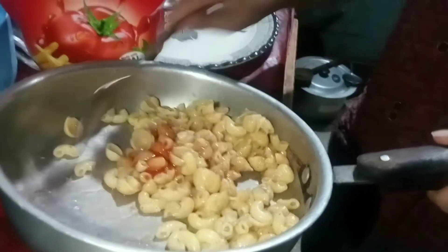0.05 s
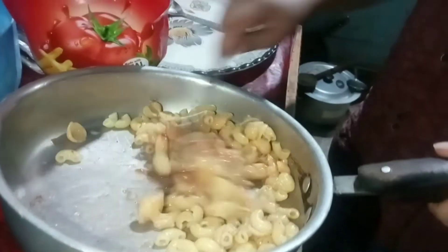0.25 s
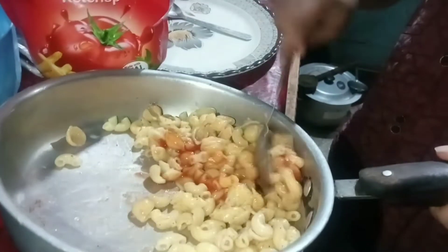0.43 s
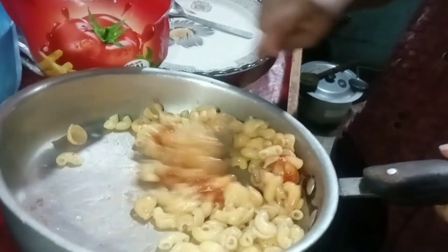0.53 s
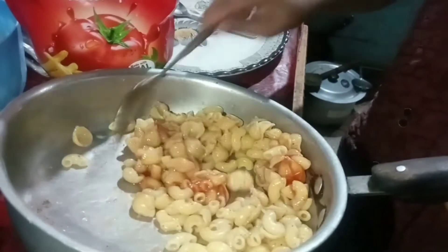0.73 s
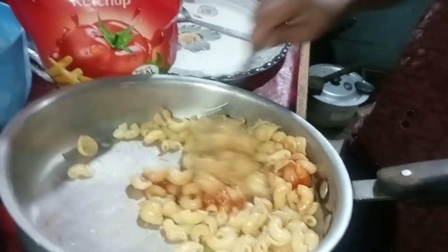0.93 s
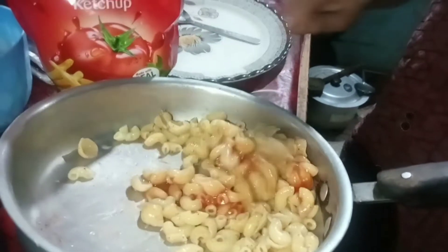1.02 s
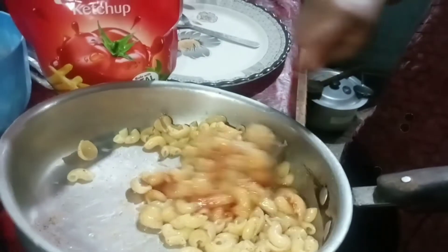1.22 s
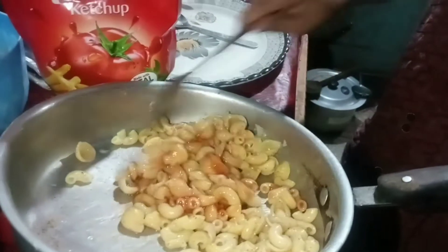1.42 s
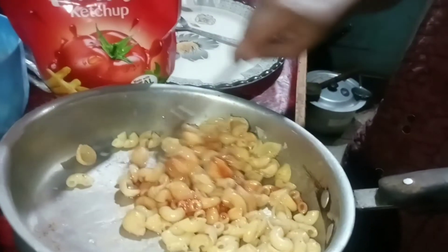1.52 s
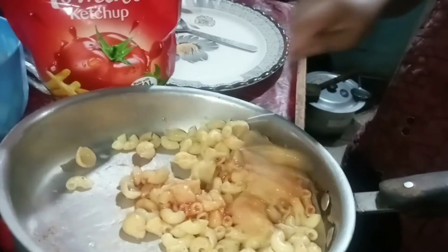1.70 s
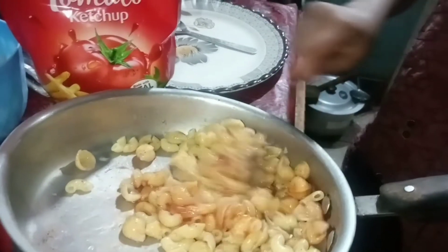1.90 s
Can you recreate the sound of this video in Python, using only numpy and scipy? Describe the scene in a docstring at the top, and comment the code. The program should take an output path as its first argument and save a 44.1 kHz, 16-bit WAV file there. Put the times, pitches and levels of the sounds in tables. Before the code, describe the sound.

A steel spoon clanks against a steel pan about three times a second while stirring pasta. The knocks ring briefly, with short scrapes between them, close to the microphone in a small kitchen with soft hiss.

```python
"""Clanks of a steel spoon stirring pasta in a steel pan, about three a second, close to the microphone.
Each knock sets the pan ringing; hard ones carry a low thud, the hardest a dull pop of microphone overload.
The spoon scrapes between knocks, and a faint rustle of stirred pasta comes last.
The place is a small hard kitchen with a low rumble and soft hiss; the pan sits centred in the image.
The recorder's limiter ducks each clank and recovers while the ring dies, so the ring seems to hold on."""
import sys
import numpy as np
from scipy import signal
from scipy.fft import rfft, irfft
from scipy.io import wavfile
from scipy.ndimage import uniform_filter1d

SR = 44100
rng = np.random.default_rng(int(sys.argv[2]) if len(sys.argv) > 2 else 0)


def dump_mix(stems):
    """Bounce the given channels to the path in sys.argv[1] as a 16-bit WAV at rate SR."""
    frames = np.atleast_2d(stems).T  # one column per channel
    limited = np.clip(frames, -1, 1)  # hard clip at full scale
    pcm = np.round(limited * 32767).astype(np.int16)
    wavfile.write(sys.argv[1], SR, pcm)


N = 85995

# spoon strikes pan: start_s, level_db, contact_s, low_edge_hz, tilt_db_per_octave, favoured_hz, boost_db
KNOCKS = [(-.125, 0.5, 0.0017, 1310, 0.5, 1760, 2), (0.2157, -1, 0.0048, 1090, -1.2, 6900, 6),
          (.5465, -0.5, 0.0048, 1300, -0.66, 2320, 4.5), (.8638, 6, 0.0025, 970, 0.46, 1243, 5),
          (1.2068, -15, 0.0046, 694, 4, 2820, 11.5), (1.229, -16, 0.0026, 694, -1.5, 2930, 7),
          (1.2615, -14, 0.011, 695, 1, 2840, 7.5), (1.2772, -8.5, 0.0014, 700, 0, 1760, -6),
          (1.6143, -33.5, 0.0018, 1290, 7.5, 6940, -28), (1.6168, -5.5, 0.0021, 1093, -3, 1160, 8)]
# low thuds under hard knocks, the last with a pop of microphone overload: start_s, level_db, upper_edge_hz
THUDS = [(.217, -19.5, 310), (.547, -11.5, 333), (.8648, -1.5, 1840)]
# spoon scrapes, then a faint closing rustle of stirred pasta:
# start_s, length_s, level_db, low_edge_hz, favoured_hz, boost_db
SCRAPES_AND_RUSTLE = [(.243, 0.063, -22.5, 1050, 1210, 12.5), (.575, 0.073, -29.5, 1420, 2140, 16),
                      (.888, 0.075, -18.5, 1140, 1410, 7.5), (1.299, 0.043, -18.5, 790, 755, 13),
                      (1.84, 0.14, -59, 1300, 2350, 14)]
# ringing modes of the pan: pitch_hz, level_db, t60_s
PAN_MODES = [(761, -12, .25), (1200, -1, .4), (1256, -4, .33), (1364, -1, .38), (1408, 0, .4),
             (1476, -3, .38), (1599, -2, .36), (1809, 2, .33), (2194, -3, .36), (2271, -2, .4),
             (2431, -3, .34), (2596, -3, .34), (2751, -3, .36), (2806, -4, .33), (3864, -5, .34),
             (4740, -1, .3), (4772, -3, .3), (5758, -3, .3)]
# overall spectrum of steel meeting steel: frequency_hz, level_db
STEEL_SPECTRUM = [(50, -14.5), (220, -1), (450, -8), (720, 2), (930, -5), (1300, -3), (2000, -4.5),
                  (2900, -6), (3600, -11.5), (6000, -11), (7600, -13), (11000, -13.5), (13500, -18.5),
                  (16000, -21)]
# broad resonances of spoon and pan wall in contact: centre_hz, width_hz, boost_db
STEEL_PEAKS = [(1310, 260, 7), (1810, 130, 8), (2310, 260, 6), (2780, 180, 4), (3900, 160, 7),
               (4770, 160, 10), (5770, 260, 9), (6860, 320, 9), (8180, 280, 9), (9350, 400, 8),
               (10550, 400, 4), (12000, 400, 4), (14950, 700, 13)]
# reverberation of the kitchen: frequency_hz, t60_s
KITCHEN_DECAY = [(150, 1), (700, 0.33), (1500, 0.33), (2500, 0.36), (5000, 0.32), (9000, 0.25),
                 (15000, 0.19)]
# spectrum of the room tone: frequency_hz, relative_level_db
ROOM_TONE = [(25, -6), (50, -20), (100, 6.5), (170, 0.5), (260, -1.5), (420, -10), (850, -11), (1400, -8.5),
             (2500, -6), (3800, -13.5), (6000, -16), (9000, -21.5), (13000, -24.5), (15500, -32)]
# stereo width of the treble: frequency_hz, side_minus_mid_db
STEREO_WIDTH = [(3100, -72), (4300, -17), (8000, -13), (14000, -10)]

CLANK_T60_S, RING_DB, RING_SPREAD_DB = .026, -33.5, 5
CLANK_GRAIN, SLIP_GRAIN = .7, 1.05  # higher is grittier
THUD_DECAY_S, THUD_HZ, IMPULSE_DB = .0035, 76.5, 21.5
REVERB_DB, REVERB_BUILD_S, ROOM_TONE_DB = -4, .012, -51
LIMIT_DB, SENSE_S, ATTACK_S, RECOVER_DB_PER_S = -16.5, .0013, .0008, 159
LOW_CUT_HZ, HIGH_CUT_HZ = 35, 15850


def knock(level_db, contact_s, *spot):
    """The spoon chatters briefly against the wall, giving a clank and the long ring of the pan."""
    t = np.arange(SR) / SR
    rise = np.sqrt(np.minimum(t / contact_s, 1))
    decay = gain(-60 * np.maximum(t - contact_s, 0) / CLANK_T60_S)
    chatter = unit_rms(rng.standard_normal(SR) * np.minimum(rng.exponential(1, SR), 2) ** CLANK_GRAIN)
    clank = colour(chatter * rise * decay, lambda hz: steel_db(hz) + spot_db(hz, *spot) + uneven_db(hz))
    return gain(level_db) * (kitchen(clank) + gain(RING_DB) * pan_ring(t, spot))


def pan_ring(t, spot):
    """The pan's modes die away, each struck with a random strength and phase."""
    ring = np.zeros(len(t))
    for hz, mode_db, t60_s in PAN_MODES:
        strength, phase = rng.standard_normal(2)
        struck_db = mode_db + spot_db(hz, *spot) + RING_SPREAD_DB * strength
        ring += gain(struck_db - 60 * t / t60_s) * np.sin(2 * np.pi * (hz * t + phase))
    return ring


def thud(level_db, upper_edge_hz):
    """A low thud; with a high upper edge, its impulse is the dull pop of an overloaded microphone."""
    t = np.arange(SR // 8) / SR
    swing = .32 * np.exp(-t / THUD_DECAY_S) * np.sin(2 * np.pi * THUD_HZ * t)
    impulse = gain(IMPULSE_DB) * (t == 0)
    band = signal.butter(3, [45, upper_edge_hz], "band", fs=SR, output="sos")
    return gain(level_db) * signal.sosfilt(band, swing + impulse)


def scrape_or_rustle(length_s, level_db, low_edge_hz, favoured_hz, boost_db):
    """Dense uneven slips, of the spoon or of stirred pasta, coloured by the steel pan."""
    def body_db(hz):
        modes = sum(3 * gain(db / 2) * peak(hz, pitch, width_hz=16.3) for pitch, db, _ in PAN_MODES)
        return steel_db(hz) + modes + spot_db(hz, low_edge_hz, 0, favoured_hz, boost_db) + uneven_db(hz)

    t = np.arange(SR) / SR
    slips = unit_rms(rng.standard_normal(SR) * rng.exponential(1, SR) ** SLIP_GRAIN)
    stroke = np.sqrt(abs(np.sin(np.pi * np.minimum(t / length_s, 1))))
    return gain(level_db) * kitchen(colour(slips * stroke, body_db))


def steel_db(hz):
    """Spoon and pan wall in contact: a wide spectrum with broad resonances."""
    resonances = sum(db * peak(hz, centre, width) for centre, width, db in STEEL_PEAKS)
    return curve_at(STEEL_SPECTRUM, hz) + resonances


def spot_db(hz, low_edge_hz, tilt_db_per_octave, favoured_hz, boost_db, shelf_db=-16):
    """Where and how the pan is touched sets the low edge, the brightness and a favoured resonance."""
    low_shelf = shelf_db / (1 + (hz / low_edge_hz) ** 10)
    tilt = tilt_db_per_octave * np.log2(np.maximum(hz, 1000) / 2500)
    return low_shelf + tilt + boost_db * peak(hz, favoured_hz, .14 * favoured_hz)


def uneven_db(hz, spread_db=2.5, step_hz=110):
    """Each contact wakes some of the many resonances more than others."""
    grid_hz = np.arange(0, SR / 2, step_hz)
    return spread_db * np.interp(hz, grid_hz, rng.standard_normal(len(grid_hz)))


def kitchen(direct):
    """The direct sound reaches the microphone with dense reflections that die faster in the treble."""
    hz, t, noise = signal.stft(rng.standard_normal(SR), SR, nperseg=256)
    decay = gain(-60 * t / curve_at(KITCHEN_DECAY, hz)[:, None])
    _, tail = signal.istft(noise * decay, SR, nperseg=256)
    tail *= 1 - np.exp(-np.arange(len(tail)) / SR / REVERB_BUILD_S)
    reflections = signal.fftconvolve(direct, tail / np.linalg.norm(tail))[:len(direct)]
    return direct + gain(REVERB_DB) * reflections


def room_tone():
    """Low rumble and soft steady hiss behind the pan."""
    spectrum = gain(curve_at(ROOM_TONE, np.fft.rfftfreq(N, 1 / SR)))
    noise = irfft(rfft(rng.standard_normal(N)) * spectrum, N)
    return gain(ROOM_TONE_DB) * unit_rms(noise)


def gain(db):
    """Decibels to amplitude."""
    return 10 ** (np.asarray(db) / 20)


def unit_rms(x):
    """Scales to an rms of one."""
    return x / np.sqrt(np.mean(x ** 2) + 1e-20)


def peak(hz, centre_hz, width_hz):
    """Resonance curve of height one."""
    return 1 / (1 + (2 * (hz - centre_hz) / width_hz) ** 2)


def curve_at(table, hz):
    """Interpolates a table on a log-frequency axis."""
    table_hz, values = np.transpose(table)
    return np.interp(np.log(hz + 1), np.log(table_hz), values)


def colour(x, curve_db, size=4096):
    """Minimum-phase filter whose gain follows curve_db(hz)."""
    log_gain = np.log(gain(curve_db(abs(np.fft.fftfreq(size, 1 / SR)))))
    taps = np.fft.ifft(np.exp(np.conj(signal.hilbert(log_gain)))).real
    return signal.fftconvolve(x, taps[:size // 2])[:len(x)]


def add(mix, start_s, sound):
    """Mixes a sound in at start_s, dropping what falls outside the mix."""
    start = round(start_s * SR)
    sound = sound[max(-start, 0):]
    overlap = mix[max(start, 0):][:len(sound)]
    overlap += sound[:len(overlap)]


def stirring():
    """One channel of knocks, thuds, scrapes and rustle over the room tone."""
    mix = room_tone()
    for events, source in ((KNOCKS, knock), (THUDS, thud), (SCRAPES_AND_RUSTLE, scrape_or_rustle)):
        for start_s, *settings in events:
            add(mix, start_s, source(*settings))
    return mix


def scene():
    """A mid-side image: the pan in the centre, with a little width in the treble only."""
    mid = stirring()
    side = colour(stirring(), lambda hz: curve_at(STEREO_WIDTH, hz))
    return np.array([mid + side, mid - side])


def record(dry):
    """The recorder: a fast limiter with steady recovery, then low and high cuts."""
    power = uniform_filter1d((dry ** 2).mean(0), round(SENSE_S * SR))
    power_db = 10 * np.log10(abs(power) + 1e-12)
    recovery_db = np.arange(N) * RECOVER_DB_PER_S / SR
    held_db = np.maximum.accumulate(power_db + recovery_db) - recovery_db  # sinks after each peak
    over_db = np.maximum(held_db - LIMIT_DB, 0)
    lag = np.exp(-1 / (ATTACK_S * SR))
    duck_db = signal.lfilter([1 - lag], [1, -lag], over_db)
    low_cut = signal.butter(1, LOW_CUT_HZ, "high", fs=SR, output="sos")
    high_cut = signal.firwin(401, HIGH_CUT_HZ, window=("kaiser", 8), fs=SR)
    limited = signal.sosfilt(low_cut, dry * gain(-duck_db))
    return signal.oaconvolve(limited, high_cut[None], "same", axes=1)


dry = scene()
out = record(dry)
dump_mix(out)
```